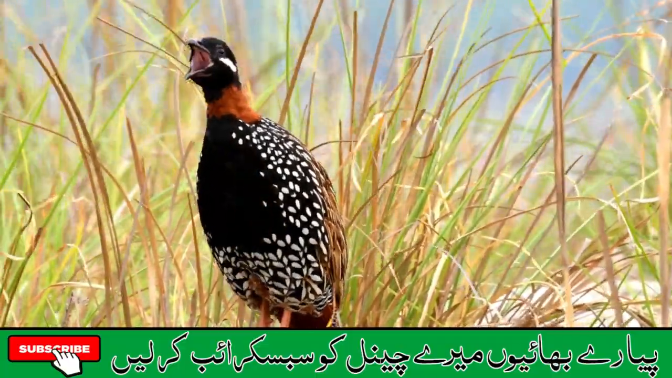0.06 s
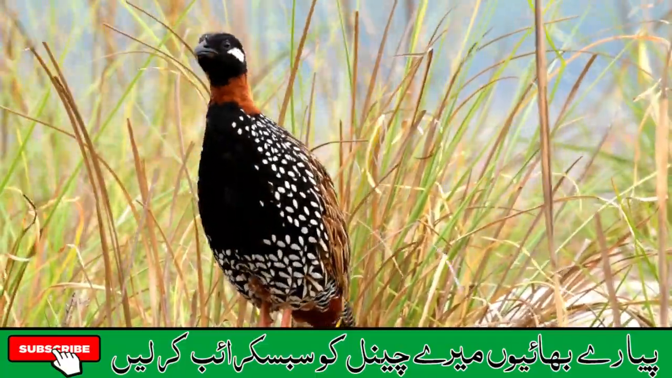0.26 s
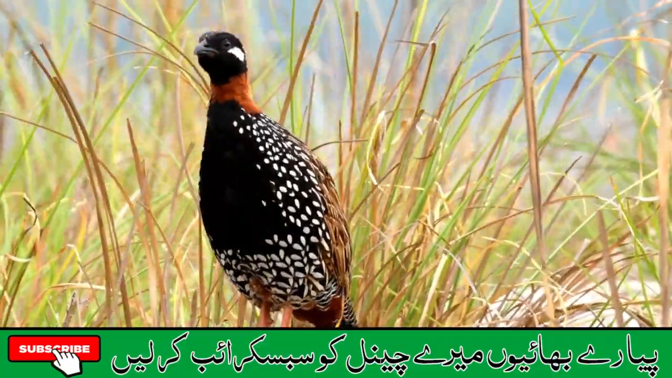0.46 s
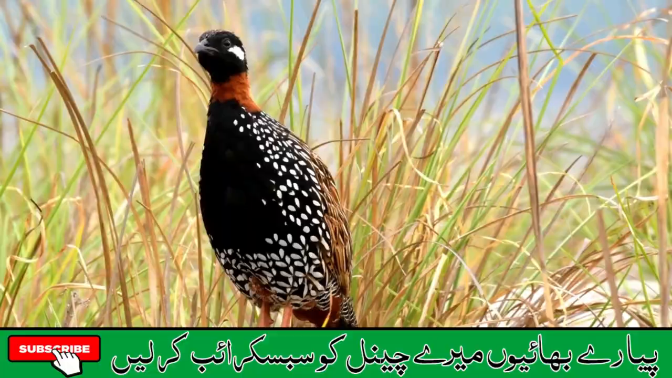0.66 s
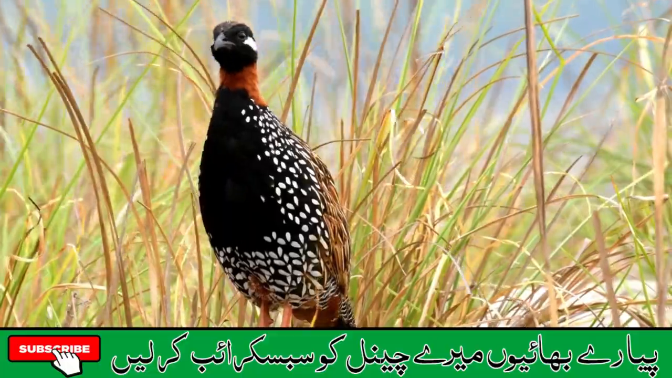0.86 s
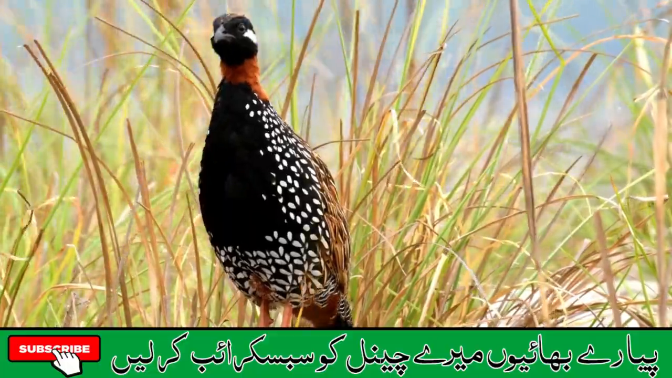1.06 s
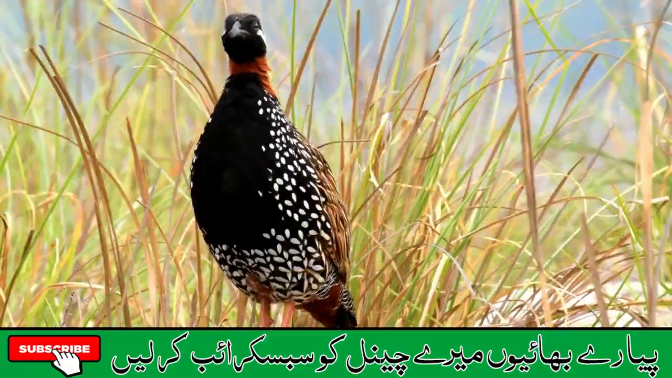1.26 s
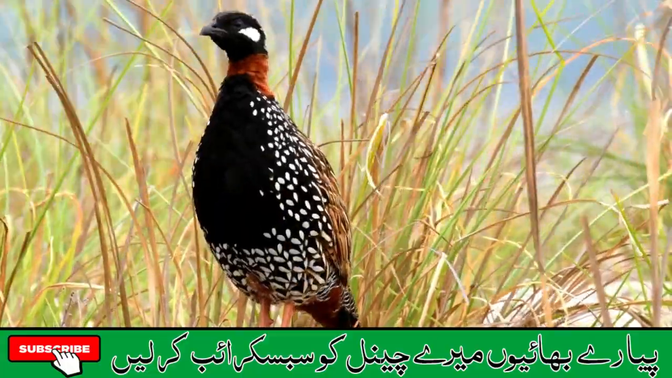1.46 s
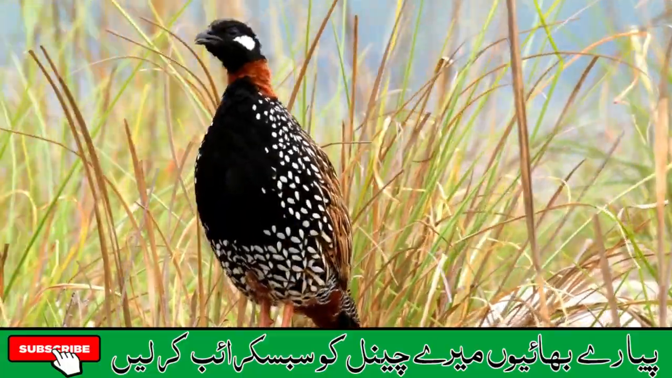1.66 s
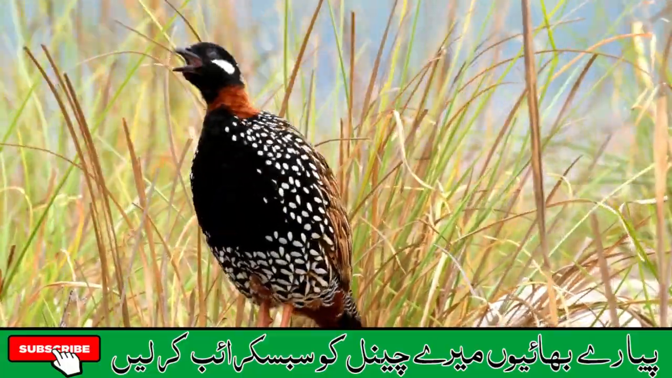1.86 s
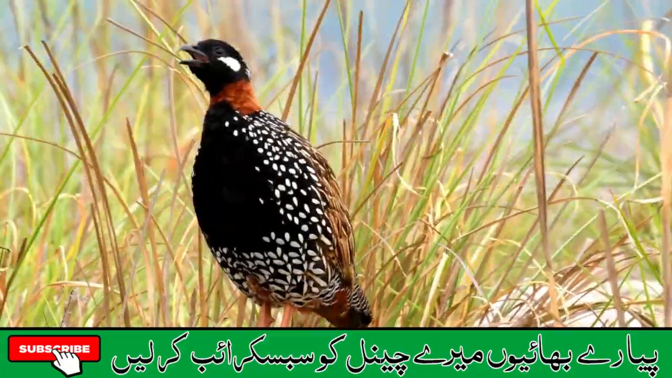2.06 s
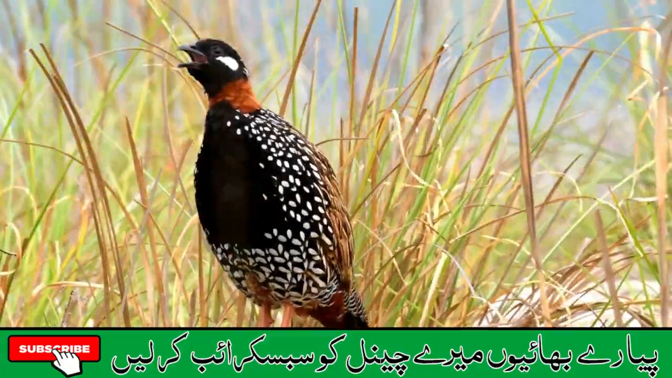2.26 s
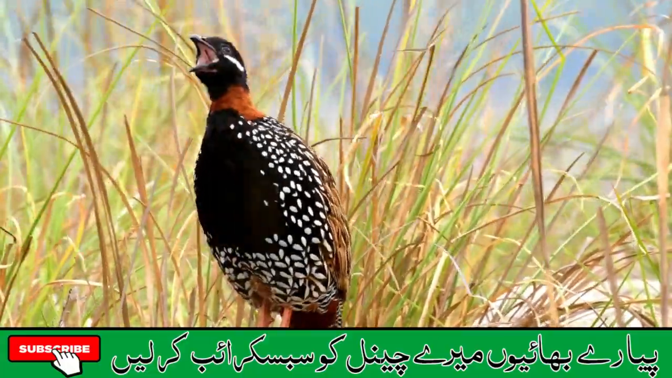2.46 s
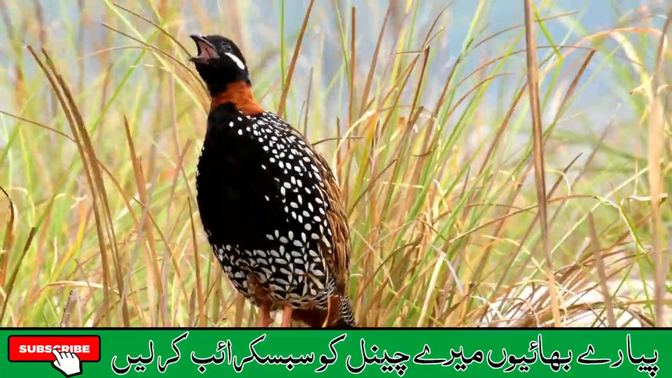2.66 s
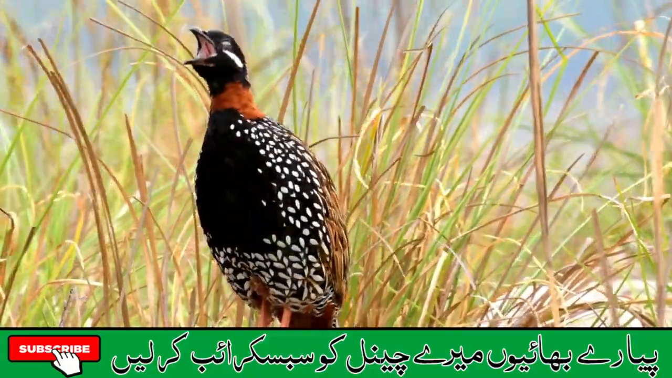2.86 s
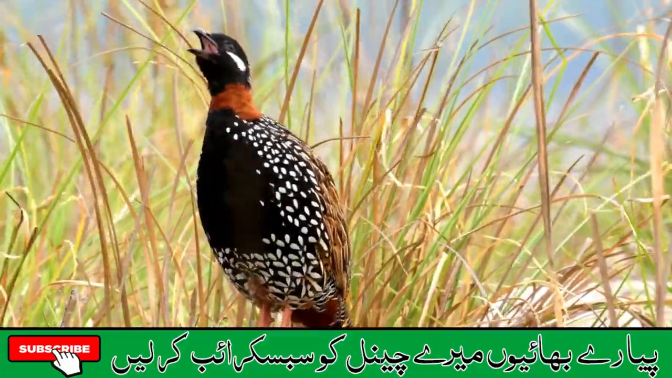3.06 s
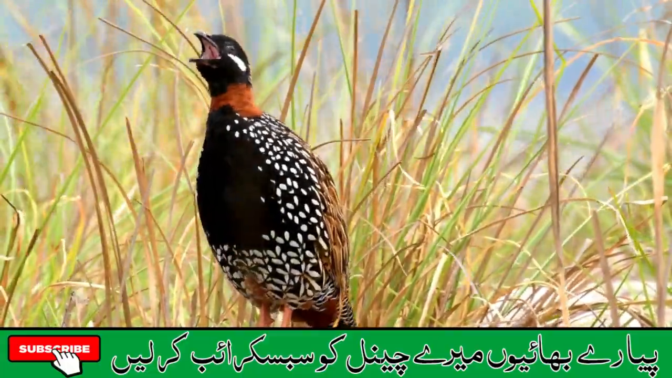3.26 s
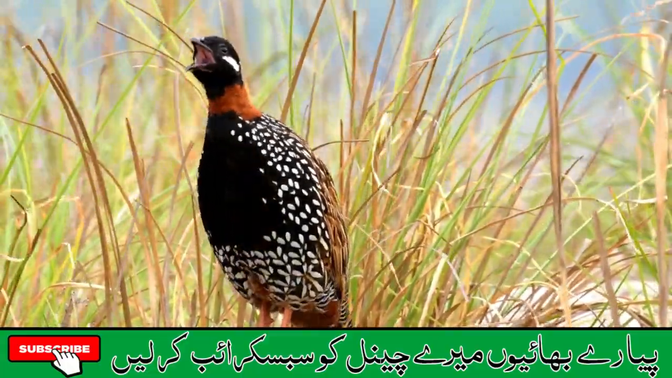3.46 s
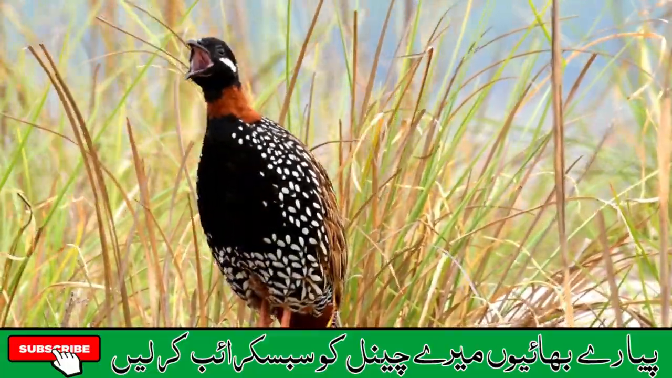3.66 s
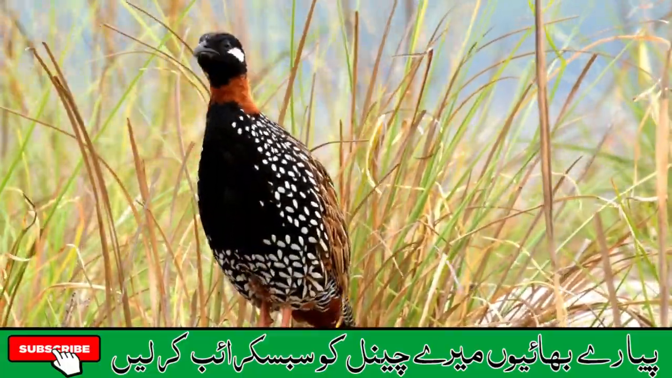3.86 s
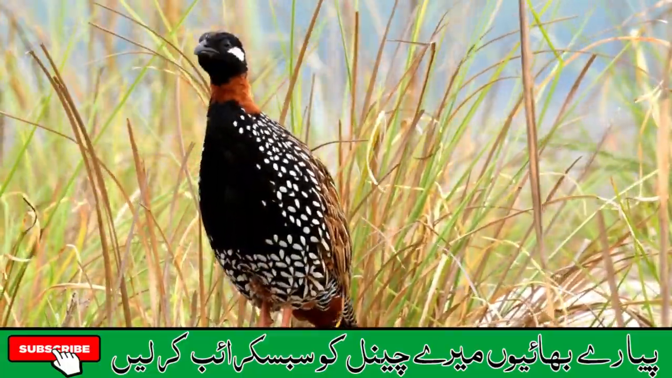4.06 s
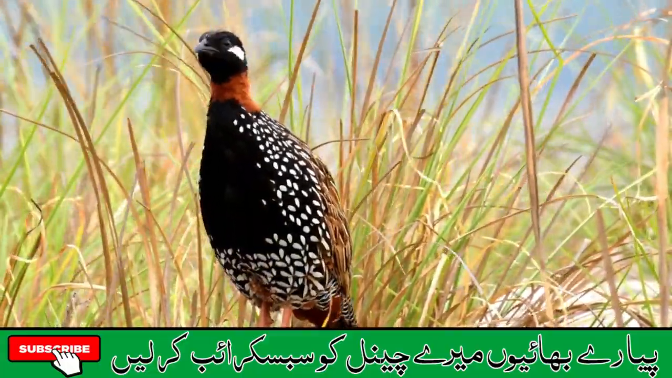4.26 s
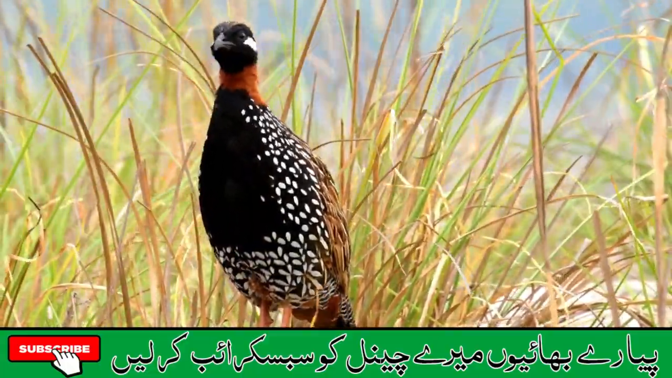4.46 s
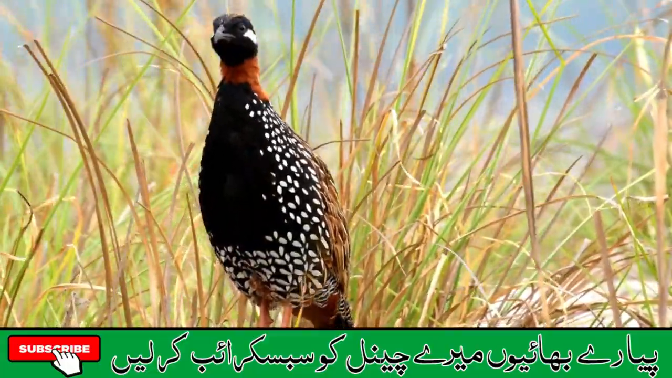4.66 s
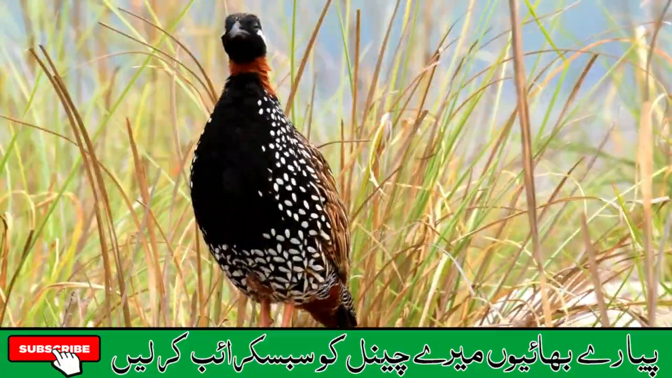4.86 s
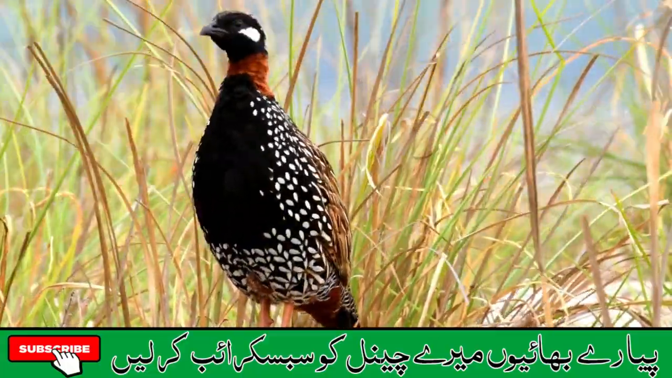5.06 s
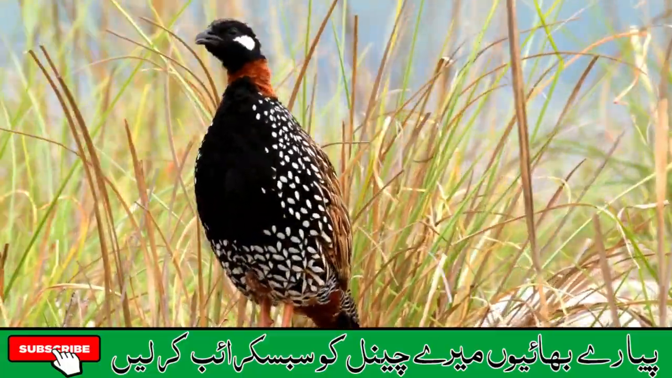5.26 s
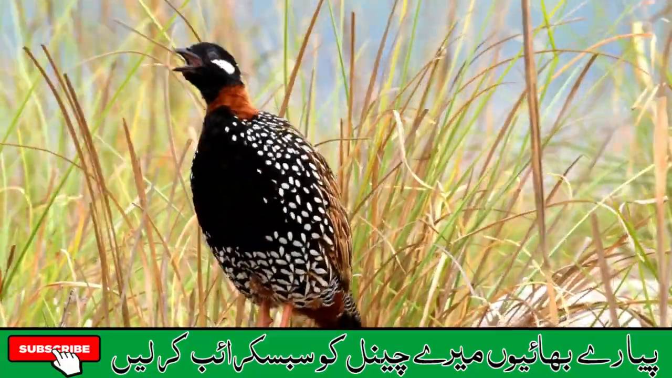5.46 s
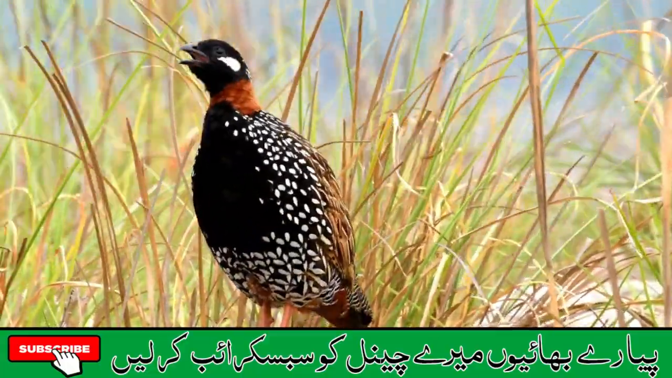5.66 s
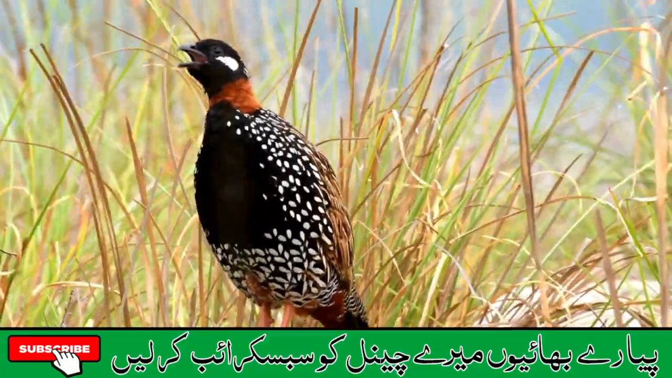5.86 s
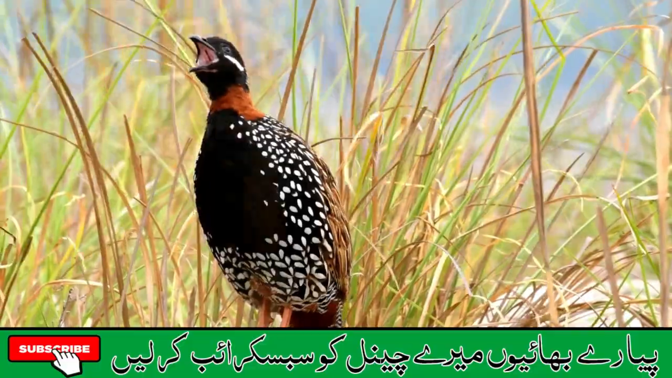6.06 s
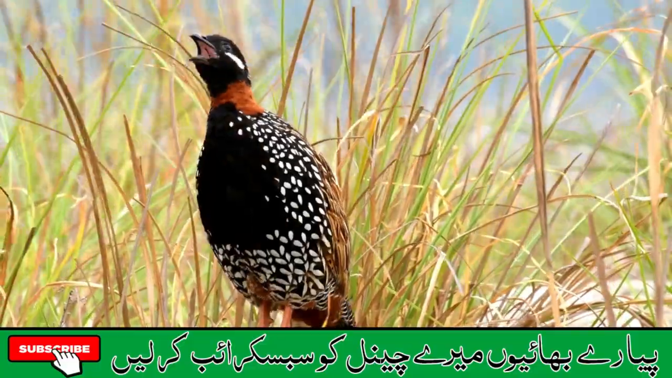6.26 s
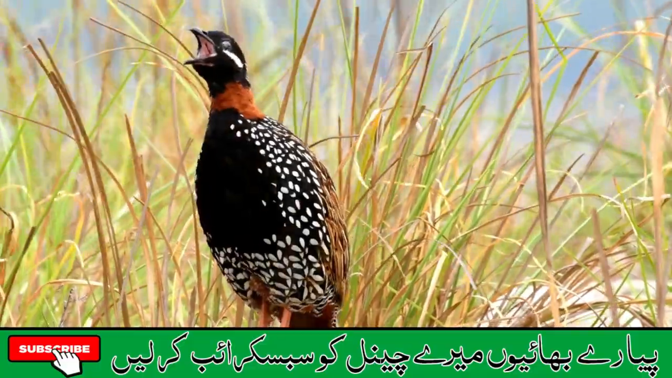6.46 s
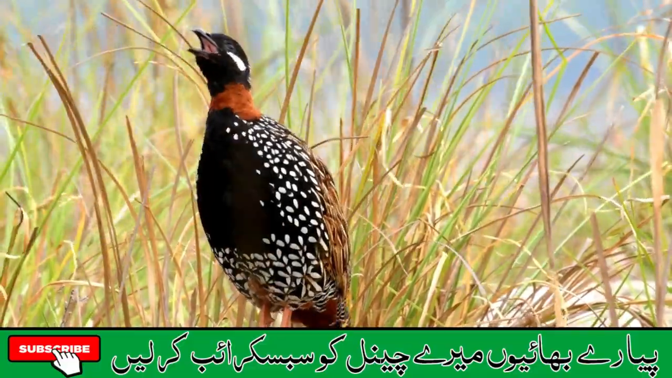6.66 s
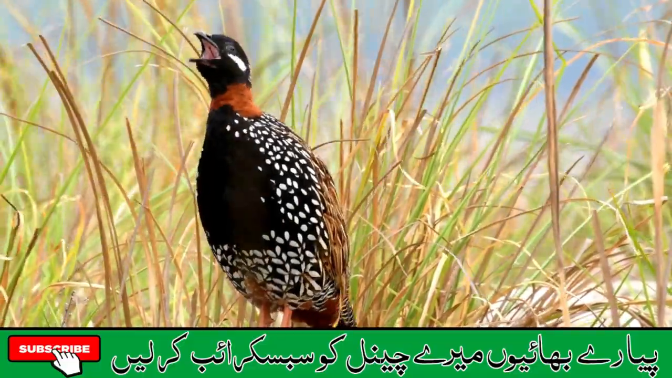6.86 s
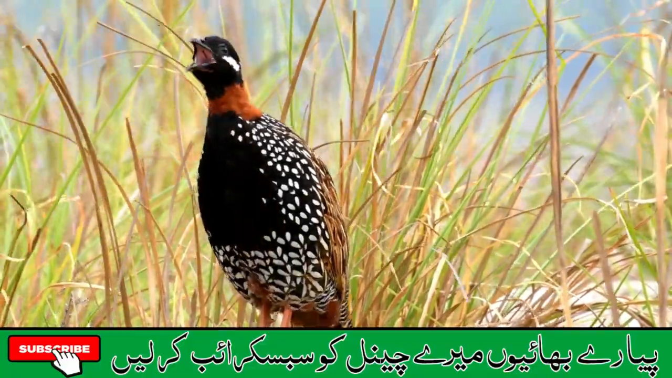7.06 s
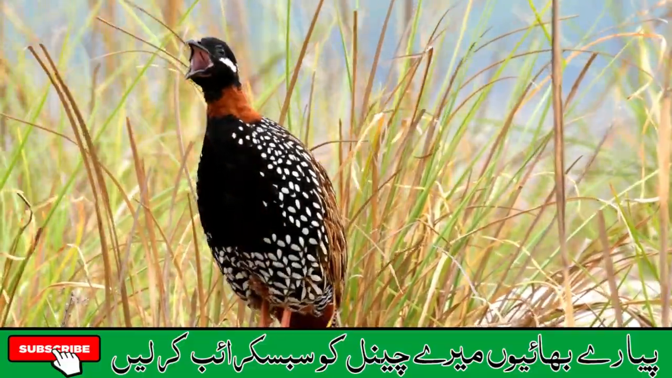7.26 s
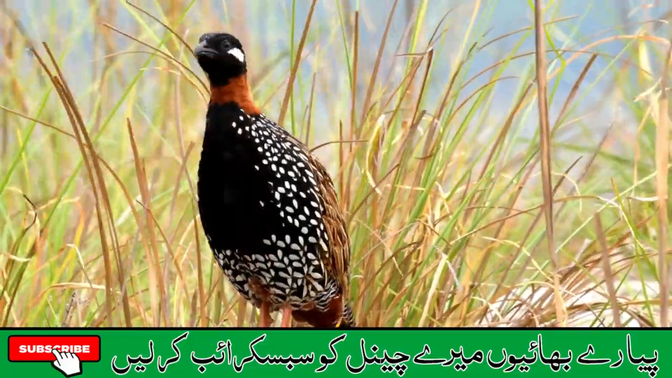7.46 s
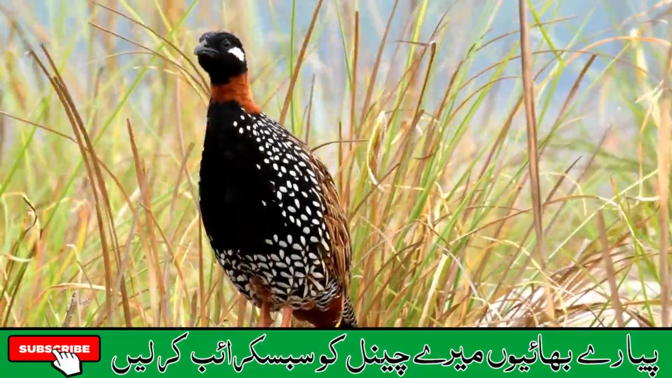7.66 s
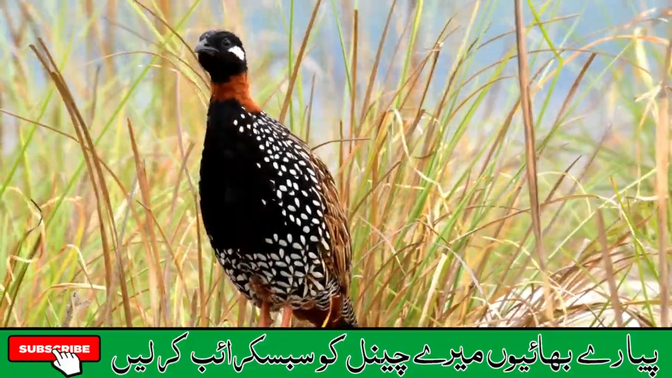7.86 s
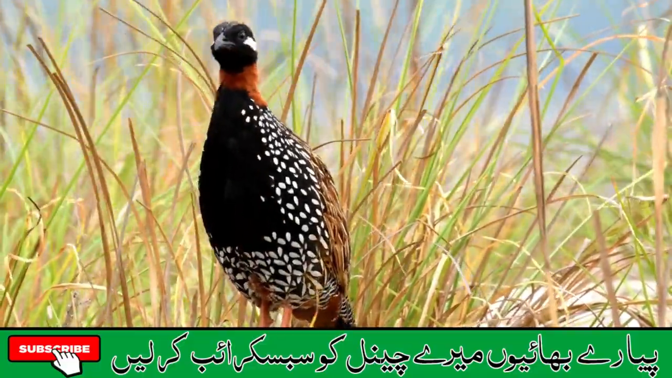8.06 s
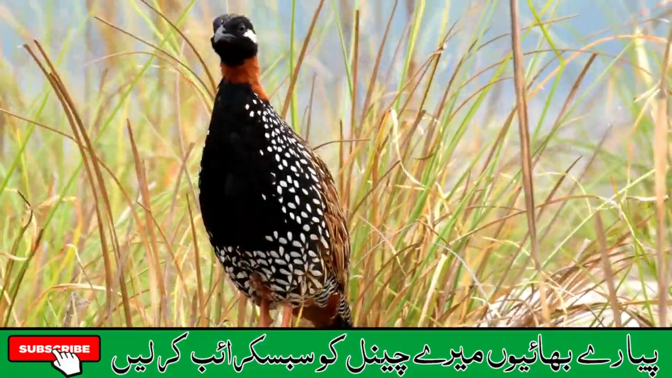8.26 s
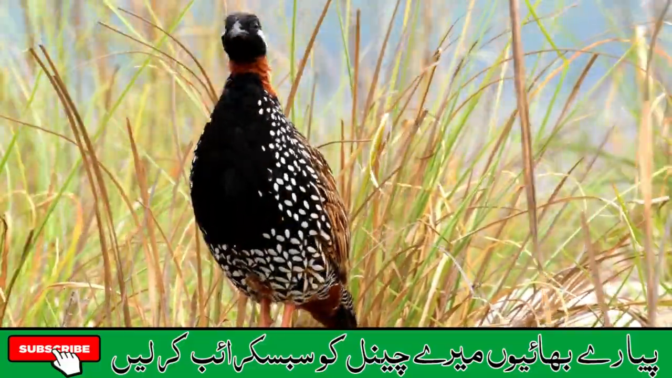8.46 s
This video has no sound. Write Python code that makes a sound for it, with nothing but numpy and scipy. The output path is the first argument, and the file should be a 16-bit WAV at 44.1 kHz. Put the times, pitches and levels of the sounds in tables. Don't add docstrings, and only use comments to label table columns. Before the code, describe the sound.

Outdoors in grass, a close ground bird finishes a harsh buzzing note, pauses, then gives a clipped throbbing chirp and four loud, high, grating rasps. The second and fourth crack briefly into a clean whistle. After a pause the identical phrase repeats. Low wind rumble and thumping buffets hit the microphone, heavier on the right, with faint hiss and a tiny distant songbird in the gaps.

```python
import sys
import numpy as np
from scipy import signal
from scipy.fft import rfft, irfft, next_fast_len
from scipy.io import wavfile
from scipy.ndimage import uniform_filter1d

SR = 44100
rng = np.random.default_rng(int(sys.argv[2]) if len(sys.argv) > 2 else 0)


def ratio(d):
    e = np.asarray(d, float) / 20
    return 10 ** e


def put_to_file(sound):
    columns = np.atleast_2d(sound).T
    safe = np.clip(columns, -1, 1)
    whole_steps = np.round(safe * 32767)
    wavfile.write(sys.argv[1], SR, whole_steps.astype(np.int16))


N = 375732


def rms_one(x):
    return x / np.sqrt(np.mean(x ** 2) + 1e-20)


def ramp(x):
    return np.clip(x, 0, 1)


def noise(*shape):
    return rng.standard_normal(shape)


def butter(order, hz, kind, x):
    return signal.sosfilt(signal.butter(order, hz, kind, fs=SR, output="sos"), x)


def colour(x, points):
    size = next_fast_len(N)
    hz, db = np.transpose(points)
    f = np.arange(size // 2 + 1) * SR / size
    gain = ratio(np.interp(np.log(f + 1), np.log(hz), db))
    return irfft(rfft(x, size) * gain, size)[..., :N]


def drift(rate):
    r = np.exp(-2 * np.pi * rate / SR)
    return rms_one(signal.lfilter([1], [1, -2 * r, r * r], noise(N + 20000))[20000:])


def in_time(tables):
    t = np.arange(N) / SR
    s, *columns = np.transpose(np.concatenate(tables))
    gate = sum((t >= rows[0][0]) & (t < rows[-1][0]) for rows in tables)
    return [np.interp(t, s, c) for c in columns] + [uniform_filter1d(gate * 1., size=44)]


# [f/Hz, level/dB]
HISS_COLOUR = [(400, 3), (2500, -4.5), (5000, -2.5), (7200, -4), (7650, -13), (8300, -5.5), (9400, -5),
               (10000, -47)]
HISS_DB = -58.5


def hiss():
    edges = np.geomspace(350, 11000, 12)
    out = 0
    mid, side = colour(noise(2, N), HISS_COLOUR)
    pair = mid + ratio(-3.0) * side * [[1], [-1]]
    for low, high in zip(edges, edges[1:]):
        out = out + butter(2, [low, high], "band", pair) * ratio(1.2 * drift(15))
    return ratio(HISS_DB) * rms_one(out)


# [f/Hz, level/dB per Hz]
DEEP_COLOUR = [(12, -29.5), (25, -2.5), (45, 5), (110, 5.5), (200, 1), (400, -38), (1200, -99)]
DEEP_DB = -34.5


def deep_rumble():
    side_db = np.array([[-1.2], [1.2]])
    return ratio(DEEP_DB + side_db) * rms_one(colour(noise(2, N), DEEP_COLOUR))


# [t/s, width/s, level/dB]
LEFT_GUSTS = [
    (1.43, 0.017, -29.5),
    (1.731, 0.044, -21),
    (1.91, 0.021, -11),
    (2.2, 0.095, -35.5),
    (2.45, .08, -25),
    (2.6, .07, -24),
    (3.23, .025, -26),
    (3.619, .012, -12),
    (3.881, 0.016, -37),
    (4.14, .06, -28),
]
# [t/s, width/s, level/dB]
RIGHT_GUSTS = [(1.322, .04, -24.5), (1.479, .05, -27), (1.67, .05, -24.5), (1.91, .04, -21),
               (2.05, .05, -24), (2.3, .1, -26.5), (2.579, .05, -26), (2.73, .04, -24.5), (2.96, .1, -24.5),
               (3.2, .06, -27), (3.47, .06, -27), (3.62, 0.0092, -24.5), (3.869, .04, -23.5),
               (4.092, .05, -17.5), (4.252, .06, -19), (4.441, .04, -24.5), (4.752, .04, -15),
               (4.852, .05, -23)]
# [t/s, peak level/dB, left minus right level/dB]
SHARP_POPS = [(1.308, -13, -26.5), (1.507, -26, -23), (1.627, -27, -29), (1.743, -20.5, 8),
              (1.781, -20, -16), (1.85, -15, -23), (1.903, -17, -10.5), (1.963, -18.5, -27.5),
              (2.022, -22, -22), (2.244, -24, -25.5), (2.589, -21, -12.0), (2.642, -21, -30),
              (2.694, -31.5, -17.5), (2.829, -20.5, -31.5), (3.41, -24.5, -29), (3.611, -12, 11),
              (3.827, -32.5, -47.5), (3.859, -26, -23.5), (3.898, -18, -36.5), (4.063, -21, -33),
              (4.222, -19.5, -21.5), (4.248, -14.5, -30.5), (4.275, -12, -22.5), (4.383, -31, -27.5),
              (4.45, -12, -36.5), (4.55, -19.5, -23.5), (4.663, -26.5, -37.5), (4.712, -25, -25),
              (4.726, -9, -30), (4.91, -17, -21)]
# [f/Hz, level/dB per Hz]
WIND_COLOUR = [(12, -26.5), (20, -11), (54, 8.5), (140, 2.5), (194, 1), (229, -0.5), (307, -3), (563, -12),
               (605, -14.5), (768, -20), (1600, -47.5), (2080, -80), (3520, -120)]
BREEZE_DB = -26
BRIGHT_DB, BRIGHT_FOLLOWS = -13, 0.94
POP_DB = 4.5
SMALL_POPS_PER_S, SMALL_POP_DB, SMALL_POP_SPREAD_DB = 22, -27, 3.5


def gusts():
    t = np.arange(N) / SR
    ports = [sum(ratio(db) * np.exp(-((t - s) / width) ** 2) for s, width, db in port)
             for port in (LEFT_GUSTS, RIGHT_GUSTS)]
    return np.array(ports) + ratio([[-80], [BREEZE_DB]])


def wind_pops(strength):
    hit = rng.random((2, N)) < SMALL_POPS_PER_S * strength / SR
    pops = hit * ratio(SMALL_POP_DB + SMALL_POP_SPREAD_DB * noise(2, N)) * strength
    s, db, pan_db = np.transpose(SHARP_POPS)
    side_db = np.minimum([pan_db, -pan_db], 0)
    pops[:, (s * SR).astype(int) + 60] = ratio(db + POP_DB + side_db)
    pops *= rng.choice([-1, 1], N)
    unit = np.abs(colour(signal.unit_impulse(N, 999), WIND_COLOUR)).max()
    return ratio(11.0) * butter(2, [150, 850], "band", colour(pops, WIND_COLOUR)) / unit


def wind():
    gust = gusts()
    bright = ratio(BRIGHT_DB) * (gust / ratio(-20.5)) ** BRIGHT_FOLLOWS
    lumps = noise(2, N) * ratio(4.9 * np.minimum([drift(30), drift(68)], 2))
    eddies = noise(2, N) * ratio(7.5 * np.minimum([drift(110), drift(72)], 1.8))
    low = butter(2, [80, 330], "band", colour(lumps, WIND_COLOUR))
    high = butter(2, 330, "high", colour(eddies, WIND_COLOUR))
    push = gust * (rms_one(low) + bright * rms_one(high)) + wind_pops(gust / ratio(-26))
    stopped = .7 * np.tanh(push / .7)
    return butter(4, 1550, "low", stopped)


PARTIALS_DB = [0, -3.5, -7]


def syrinx(hz):
    phase = 2 * np.pi * np.cumsum(hz) / SR
    return sum(ratio(db) * np.sin((k + 1) * phase) for k, db in enumerate(PARTIALS_DB)) * np.sqrt(2)


# [f/Hz, level/dB]
THROAT_COLOUR = [(1000, -34), (2100, -17), (2500, -5.5), (2850, 5.5), (3150, -2.5), (4200, 2), (4500, -4),
                 (5000, 0), (6300, 3), (7000, -10.5), (7650, -22.5), (8500, -5.5), (9300, -7.5),
                 (10000, -28)]


def whistle(tables):
    hz, level_db, gate = in_time(tables)
    return colour(syrinx(hz + 25 * drift(100)), THROAT_COLOUR) * ratio(level_db) * gate


WHISTLE_EDGE_DB = 7


def arches(rows, db):
    u = np.linspace(-1, 1, num=21)
    level_db = db - WHISTLE_EDGE_DB * u ** 8
    return [np.transpose([s + length * (u + 1) / 2,
                          top_hz - np.where(u < 0, climb_hz, fall_hz) * u ** 2,
                          level_db])
            for s, length, top_hz, climb_hz, fall_hz in rows]


# [t/s, length/s, top f/Hz, climb f/Hz, fall f/Hz]
FAR_NOTES = [
    (4.185, .035, 5060, 30, -40),
    (4.775, .06, 6450, 1050, 0),
    (4.835, .045, 6450, 0, 0),
]
FAR_BIRD_DB = -55.5


def far_bird():
    return whistle(arches(FAR_NOTES, FAR_BIRD_DB)) * ratio(4 * drift(60) + np.array([[-14], [-9]]))


# [f/Hz, level/dB]
BUSH_COLOUR = [(2000, 2), (3500, -9.5), (5500, -3), (7000, -2), (9500, 1)]
NEAR_T60_S, NEAR_DB = .035, -1
FIELD_T60_S, FIELD_DB, FIELD_DEPTH_S = 0.43, -16.5, .15
BANK_ECHO_S, BANK_ECHO_DB = .24, -46


def field(x):
    t = np.arange(round(.8 * SR)) / SR
    near = ratio(NEAR_DB - 60 * t / NEAR_T60_S) * (t > .001)
    bushes = ratio(FIELD_DB - 60 * t / FIELD_T60_S) / (1 + (t / FIELD_DEPTH_S) ** 12)
    echo = ratio(BANK_ECHO_DB) * np.exp(-((t - BANK_ECHO_S) / .025) ** 2)
    grain = noise(2, len(t)) / np.sqrt(SR / 50)
    early = signal.fftconvolve(x[None], grain * near, axes=1)[:, :N]
    late = signal.fftconvolve(x[None], grain * (bushes + echo), axes=1)[:, :N]
    return early + colour(late, BUSH_COLOUR)


# [t/s, length/s, level/dB, fades by level/dB]
PUFF_TIMES = [
    (1.299, 0.057, -47.5, 4),
    (1.913, .03, -54.5, -3.5),
    (1.937, 0.018, -17, 11),
    (1.958, .088, -34.5, 13.5),
    (2.821, 0.086, -50.5, -4.5),
    (3.019, 0.06, -28.5, 22),
    (3.781, 0.01, -36.5, -12),
]
# [f/Hz, level/dB per Hz]
PUFF_COLOUR = [(880, -49), (1500, -14.5), (2890, -3), (3560, -11), (4170, -1.5), (4510, -13.5), (6310, -6),
               (7570, -20.5), (9310, -5), (12100, -47), (20500, -120)]


def puffs():
    courses = [[(s, db), (s + length, db - fade_db)] for s, length, db, fade_db in PUFF_TIMES]
    level_db, gate = in_time(courses)
    return rms_one(colour(noise(N) * ratio(3 * drift(200)), PUFF_COLOUR)) * ratio(level_db) * gate


# [t/s, peak level/dB]
CHIRP_THROBS = [
    (1.974, -8),
    (1.978, -12),
    (1.983, -8),
    (1.9875, -1.5),
    (1.9925, -7),
    (1.998, -13),
    (2.003, -13),
    (2.008, -7),
    (2.014, -20),
    (2.019, -21),
]
CHIRP_S, CHIRP_LENGTH_S, CHIRP_CLIMB_S = 1.972, .052, .02
CHIRP_HZ, CHIRP_CLIMB_HZ, CHIRP_SAG_HZ_PER_S = 5590, 450, 8000
THROB_RISE_DB_PER_MS, THROB_FALL_DB_PER_MS = 2.5, 4.5


def chirp():
    t = np.linspace(0, CHIRP_LENGTH_S, num=200)
    climb_hz = CHIRP_CLIMB_HZ * ramp(1 - t / CHIRP_CLIMB_S) ** 2
    sag_hz = CHIRP_SAG_HZ_PER_S * np.clip(t - CHIRP_CLIMB_S, 0, CHIRP_CLIMB_S)
    s, db = np.transpose(CHIRP_THROBS)[:, :, None]
    late_ms = (CHIRP_S + t - s) * 1e3
    level_db = db - np.maximum(-THROB_RISE_DB_PER_MS * late_ms, THROB_FALL_DB_PER_MS * late_ms)
    return np.transpose([CHIRP_S + t, CHIRP_HZ - climb_hz - sag_hz, level_db.max(axis=0)])


# [t/s, length/s, top f/Hz, climb f/Hz, fall f/Hz]
CLEAN_NOTES = [
    (2.509, .012, 4860, 30, 0),
    (3.014, .045, 5740, 360, 640),
    (3.775, .031, 5670, 650, 750),
]
WHISTLE_DB = -10


def clean_whistles():
    return whistle([chirp()] + arches(CLEAN_NOTES, WHISTLE_DB))


RASP_DB, AFTER_BREAK_DB, EDGE_DB = -14.5, -2, -23.5
JOIN_S = .012
FULL_EFFORT = .64
SAG, FLIPS_PER_SAG_HZ = .6, .06
SWING_HZ, NARROWS_PER_HZ = 1290, .5
SCOOP_HZ = 240
ROUGH, EDGE_ROUGH, SETTLE_S = .29, .4, .035
WHEEZE_DB, EDGE_WHEEZE_DB = -43, 23
ATTACK_S, SWELL_S, SWELL_DB = .013, .06, 7
RELEASE_S, FADE_S, FADE_DB = .018, 0.023, 3.5


def rasp_course(s, length, flips, top_hz, climb_hz):
    t = np.linspace(0, length, num=60)
    left, u = length - t, t / length
    climbs = climb_hz > 0
    from_whistle = climb_hz == 0 or any(abs(s - w[0] - w[1]) < JOIN_S or abs(s - w[0]) < JOIN_S
                                        for w in CLEAN_NOTES)
    into_whistle = any(abs(s + length - w[0]) < JOIN_S for w in CLEAN_NOTES)

    start_db = 0 * t if from_whistle else EDGE_DB * ramp(1 - t / ATTACK_S)
    fade_db = FADE_DB * ramp(1 - (left - RELEASE_S) / FADE_S) * (climb_hz < 400)
    end_db = 0 * t if into_whistle else EDGE_DB * ramp(1 - left / RELEASE_S) - fade_db
    swell_db = SWELL_DB * ramp(1 - t / SWELL_S) ** 2 * (.5 if from_whistle else 1) * climbs
    level_db = RASP_DB + AFTER_BREAK_DB * (climb_hz <= 0) - swell_db + start_db + end_db

    full = 1 if into_whistle else FULL_EFFORT
    sag_hz = SAG * abs(climb_hz) * ramp((u - full) / (1 - FULL_EFFORT))
    scoop_hz = SCOOP_HZ * ramp(1 - t / SETTLE_S) ** 2 * climbs
    line_hz = top_hz - climb_hz * ramp(1 - u / full) ** 1.1 - sag_hz - scoop_hz
    swing_hz = SWING_HZ - NARROWS_PER_HZ * max(climb_hz, 0) * u
    unsettled = np.maximum(ramp(1 - t / SETTLE_S), ramp(1.3 - left / SETTLE_S) * (not into_whistle))
    return np.transpose([s + t, level_db, WHEEZE_DB + EDGE_WHEEZE_DB * unsettled,
                         flips - FLIPS_PER_SAG_HZ * sag_hz, line_hz, swing_hz,
                         ROUGH + EDGE_ROUGH * unsettled])


# [t/s, length/s, flips per s, strongest line at full effort f/Hz, climb to it f/Hz]
RASP_NOTES = [
    (2.008, .018, 240, 5150, 0),
    (2.509, .189, 262, 5220, 500),
    (2.885, .132, 254, 5070, 230),
    (3.058, .106, 270, 4870, -30),
    (3.472, .142, 241, 5020, 260),
    (3.69, .086, 233, 4900, 150),
    (3.803, .131, 264, 4720, -130),
]


def rasp():
    courses = [rasp_course(*row) for row in RASP_NOTES]
    level_db, wheeze_db, flips, line_hz, swing_hz, rough, gate = in_time(courses)
    turn = 2 * np.pi * np.cumsum(flips * (1 + .05 * rough * drift(50))) / SR
    swing = np.sin(turn + 0.34 * np.cos(turn))
    swing = 1.411 * np.tanh(1.157 * swing)
    centre_hz = line_hz - 4 * flips
    shake_hz = rough * (150 * drift(25) + 200 * drift(400))
    strength_db = 0.59 * swing + 5.3 * rough * np.minimum(drift(390), 1.5)
    tone = syrinx(centre_hz + swing_hz * (swing - swing.mean()) + shake_hz) * ratio(strength_db)
    air = noise(N) * ratio(-14) * rough
    wheeze = butter(3, [1250, 2100], "band", noise(N))
    voice = rms_one(colour(tone + air, THROAT_COLOUR))
    thin = signal.sosfiltfilt(signal.butter(6, 2700, "high", fs=SR, output="sos"), voice)
    tight = ramp((centre_hz - swing_hz - 2750) / 200)
    voice = voice + tight * (thin - voice)
    return (voice * ratio(4) + rms_one(wheeze) * ratio(wheeze_db)) * ratio(level_db) * gate


MASK_DB, QUIET_DB = -38, -108


def thin_out(x):
    pair = np.array([x[0] + x[1], x[0] - x[1]]) / 2
    spectrum = signal.stft(pair, nperseg=1024)[2]
    starts = np.unique(np.geomspace(10, 240, 36).astype(int))
    width = np.diff(np.r_[starts, 513])
    power = np.add.reduceat(np.abs(spectrum) ** 2, starts, axis=1)
    level = np.sqrt(power / width[:, None])
    limit = np.maximum(level[0, 10:].max(axis=0) * ratio(MASK_DB), ratio(QUIET_DB))
    limit = limit * ratio(4 * uniform_filter1d(noise(*level.shape), size=2))
    kept = np.clip((level / limit) ** 8, .03, 1)
    spectrum[:, starts[0]:] *= np.repeat(kept, width, axis=1)
    mid, side = signal.istft(spectrum, nperseg=1024)[1][:, :N]
    return np.array([mid + side, mid - side])


SPLICE_JUMP = [.004, .09]
LOOP_START, LOOP_LENGTH = 57462, 158760


def splice(stretch):
    loop = stretch[:, LOOP_START:LOOP_START + LOOP_LENGTH]
    k = np.arange(LOOP_LENGTH)
    loop = loop * np.minimum(np.minimum(k, k[::-1]) / 130, 1)
    loop = loop + np.outer(SPLICE_JUMP, np.exp(-k / 130))
    return loop[:, (np.arange(N) - LOOP_START) % LOOP_LENGTH]


# [f/Hz, left minus right level/dB]
HEAD_LEAN = [(2000, 5), (3000, 3), (5000, -2.5), (9000, -2.5)]


def scene():
    bird = rasp() + clean_whistles() + puffs()
    near = np.array([colour(bird, np.multiply(HEAD_LEAN, [1, half])) for half in (.5, -.5)])
    duck = 1 / (1 + 8 * np.sqrt(uniform_filter1d(bird ** 2, size=2000) + 1e-12))
    stretch = (deep_rumble() + hiss()) * duck + wind() + far_bird() + field(bird) + near
    top_cut = signal.cheby2(10, 50, 10000, fs=SR, output="sos")
    return splice(signal.sosfilt(top_cut, thin_out(stretch)))


def band_limit(x):
    return signal.sosfilt(signal.butter(12, 9460, fs=SR, output="sos"), x)


def record(dry):
    mix = np.clip(dry, -.99, .99)
    return band_limit(mix)


dry = scene()
out = record(dry)
put_to_file(out)
```